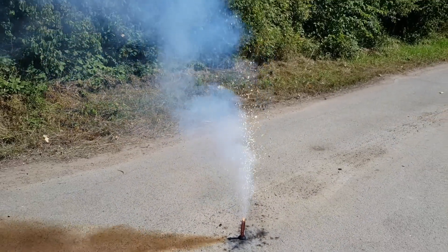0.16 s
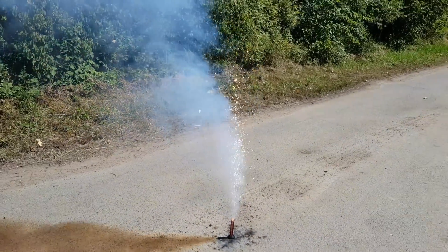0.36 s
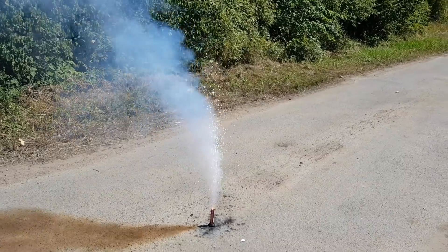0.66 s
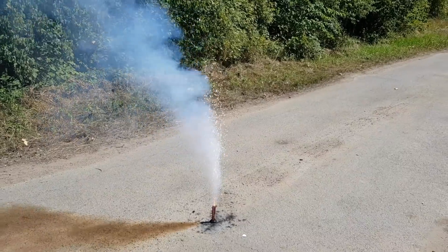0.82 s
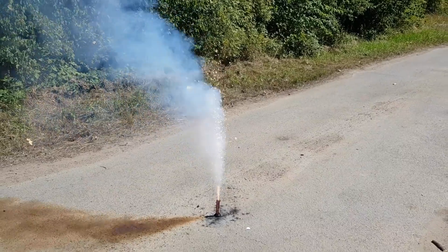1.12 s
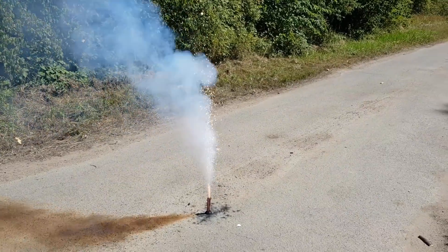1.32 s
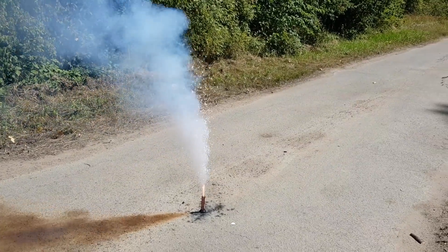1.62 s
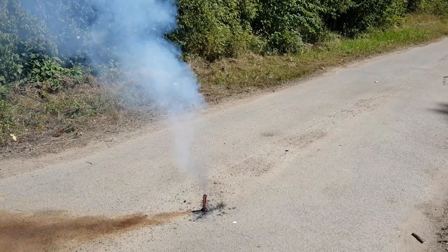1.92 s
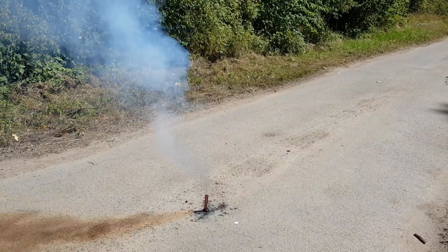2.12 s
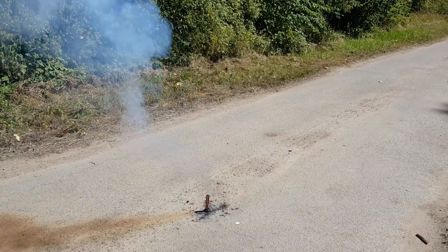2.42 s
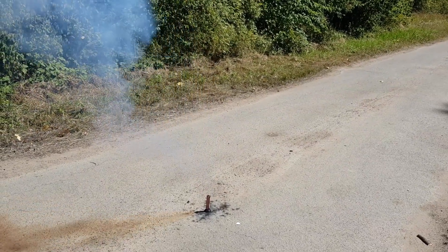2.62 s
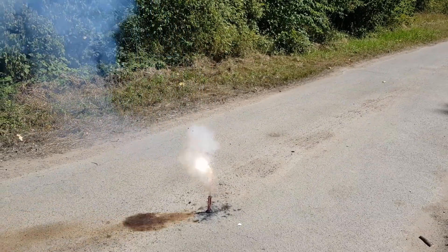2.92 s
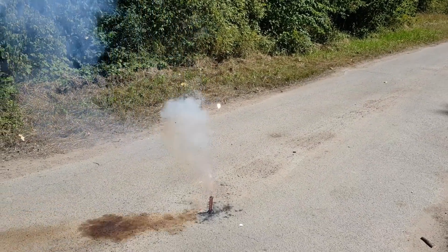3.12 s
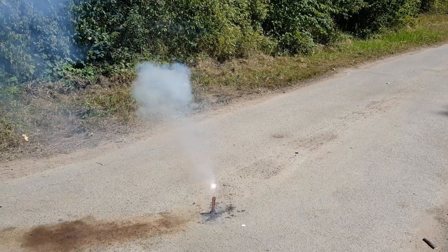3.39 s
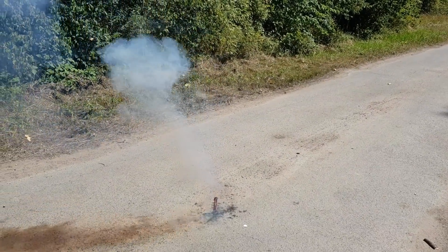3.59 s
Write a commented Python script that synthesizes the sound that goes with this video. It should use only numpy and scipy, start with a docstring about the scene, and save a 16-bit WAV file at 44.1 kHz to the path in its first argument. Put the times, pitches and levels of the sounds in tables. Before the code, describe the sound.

A small fountain firework whistles with a sinking pitch, fades to a hiss and a soft puff, then spits sharp crackles and low thumps. It burns a few metres away on an outdoor road, its cracks overloading the microphone.

```python
"""On a paved road with bushes behind it, a small fountain firework burns a few metres away.
Its tube whistles, sinking in pitch as the fuel burns down, then only hisses and goes out with a puff.
After a low smoulder it throws out crackling stars (burning pellets): sharp cracks that overload
the microphone, and a few thumps of air. The road and the bushes echo over a low outdoor rumble."""
import sys
import numpy as np
from scipy import signal
from scipy.fft import rfft, irfft
from scipy.io import wavfile
from scipy.ndimage import uniform_filter1d

SR = 44100
rng = np.random.default_rng(int(sys.argv[2]) if len(sys.argv) > 2 else 0)


def wav_record(signal):
    """Record a signal, one row per channel, as 16-bit PCM in the file named by sys.argv[1]."""
    frames = np.transpose(np.atleast_2d(signal))
    bounded = np.clip(frames, -1, 1)
    # unit amplitude maps onto the largest positive 16-bit level
    quanta = np.round(bounded * 32767).astype(np.int16)
    wavfile.write(sys.argv[1], SR, quanta)


N = 165375  # 3.75 seconds
TIME_S = np.arange(N) / SR


# The sinking note of the tube: time_s, pitch_hz
TUBE_PITCH = [(0, 3935), (.08, 3907), (.12, 3818), (.2, 3783), (.25, 3733), (.3, 3718), (.36, 3688),
              (.4, 3633), (.5, 3556), (.69, 3461), (.74, 3406), (.83, 3384), (.94, 3290), (1.0, 3287),
              (1.13, 3130), (1.35, 2954), (1.72, 2850)]
# How loud that note is on each side: time_s, left_db, right_db
NOTE_LEVELS = [(0, -14, -7.5), (.04, -22, -16), (.11, -6.5, -11), (.18, -16.5, -11), (.23, -20.5, -10),
               (.29, -12, -12.5), (.34, -11.5, -17.5), (.39, -9, -31), (.47, -11.5, -28), (.55, -9.5, -27),
               (.63, -10, -31), (.69, -14.5, -21.5), (.74, -14.5, -17), (.83, -16, -13.5),
               (.885, -32, -24.5), (.95, -13.5, -20), (1.0, -16.5, -23.5), (1.06, -24.5, -29),
               (1.15, -54, -50)]
# Overtones at 2, 3 and 4 times its pitch: time_s, second_db, third_db, fourth_db
OVERTONE_LEVELS = [(0, -28, -29.5, -43), (0.05, -37, -25, -34), (0.13, -30, -19, -45),
                   (0.3, -27.5, -23.5, -36), (0.38, -33.5, -30.5, -38), (0.5, -24.5, -37.5, -43),
                   (0.68, -24, -31, -49), (0.77, -21, -32, -55), (0.88, -23, -36.5, -46),
                   (0.94, -31, -37, -52), (1.01, -32.5, -47, -60), (1.09, -56, -77, -72)]

def whistle(wander_hz=8.95, jitter_hz=12, right_lag_ms=0.07, rough_db=-30.5):
    """Pulsing flame sounds the tube: a fluttering, slightly rough note with three overtones."""
    pitch_hz = curve(TUBE_PITCH) + wander_hz * wander(44.52) + jitter_hz * wander(500)
    lag_s = np.array([[0], [right_lag_ms / 1000]])
    phase = 2 * np.pi * (np.cumsum(pitch_hz) / SR - pitch_hz * lag_s)
    flutter_db = 0.66 * wander(119.6)
    note_db = np.array([curve(NOTE_LEVELS, 1), curve(NOTE_LEVELS, 2)]) + flutter_db
    tone = gain(note_db) * (np.sin(phase) + gain(rough_db) * noise_around(phase, 700))
    lean_left_db = np.array([[3], [-3]])
    for multiple in (2, 3, 4):
        level_db = curve(OVERTONE_LEVELS, multiple - 1) + flutter_db + 2 * wander(35) + lean_left_db
        wobble = 0.26 * np.array([wander(160), wander(160)])
        tone += gain(level_db) * np.sin(multiple * phase + wobble)
    fade = np.exp(-np.maximum(TIME_S - 1.13, 0) / 0.045)  # dies quickly after 1.13 s
    return np.sqrt(2) * tone * fade


# The breathy sound left as the whistle dies: time_s, level_db
RING_LEVEL = [(.95, -70), (1.1, -45), (1.3, -48.5), (1.7, -56), (1.85, -100)]

def tube_ring(width_hz=480):
    """The gas jet still rings the tube, as a narrow band of noise that goes on sinking."""
    phase = 2 * np.pi * np.cumsum(curve(TUBE_PITCH)) / SR
    breath = np.array([noise_around(phase, width_hz) for _ in range(2)])
    return breath * gain(curve(RING_LEVEL))


# Sharp cracks of sparks and stars, and a few of their near echoes.
# Levels are before each part's boost or cut: start_s, snap_db, body_db
SHARP_CRACKS = [(2.0543, -45, -53.5), (2.1807, -40.5, -49), (2.2053, -40.5, -49), (2.476, -29, -29.5),
                (2.5544, -38.5, -40.0), (2.609, -35, -30.5), (2.6607, -28.5, -33.5), (2.7267, -37, -28.5),
                (2.7358, -10.5, -17.5), (2.772, -29.5, -30), (2.7858, -14.5, -18), (2.8195, -7, -12.5),
                (2.8225, -9.5, -19), (2.83, -12.5, -24), (2.8478, -13, -24), (2.858, -15, -22),
                (2.862, -10, -21), (2.8675, -8, -10.5), (2.8765, 0.5, -13), (2.8958, -14.5, -21),
                (2.916, -17.5, -20), (2.9254, -7, -10), (2.938, -11.5, -29), (2.963, -14.5, -22),
                (2.9714, -10.5, -19.5), (2.9782, -8.5, -20), (2.9872, -6.5, -17), (2.9905, -11, -17),
                (2.9988, -7, -14.5), (3.0314, -4.5, -14), (3.0391, -9.5, -13.5), (3.0568, 1, -6.5),
                (3.0732, -12, -19.5), (3.0835, -11.0, -18), (3.1, -11, -13), (3.103, -16, -15.0),
                (3.1358, -14.5, -26), (3.1545, -15, -20), (3.179, -6, -9.5), (3.1925, -6, -12),
                (3.2428, 2.5, -5.5), (3.2943, -0.5, -10), (3.3015, -17.5, -28), (3.315, -7.5, -15),
                (3.3195, -7.5, -11.5), (3.338, -16, -33), (3.3602, -6, -10), (3.3845, -11, -26),
                (3.4203, -12.5, -15.5), (3.4252, -14, -20), (3.4722, -28, -30.5), (3.482, -2.5, -8.5),
                (3.5039, -23.5, -25), (3.5345, -20.5, -34), (3.5604, -10.5, -11.5), (3.6083, -5.5, -12),
                (3.6525, -16, -23.5), (3.7325, -36, -44), (3.74, -33, -36.0)]
# The mix of low and high in cracks, crackle and gas spurts: pitch_hz, relative_db
CRACK_COLOUR = [(100, 3.5), (480, 2), (750, -3.5), (1250, -2), (1800, 0.5), (2400, 2.5), (3000, -1),
                (4100, 1), (5000, 2.5), (6400, 3), (8000, -2.5), (12000, -1.5), (16000, -2.5)]
BOUNCE_MS, BOUNCE_DB = 1.9, -8  # the echo off the road

def cracks(noise_decay_ms=0.65, grit_decay_ms=2.4):
    """Each crack is a bright snap over a duller push of gas, with a bounce off the road and grit."""
    out, size = np.zeros((2, N)), 512
    ms = np.arange(size) / SR * 1000
    noise_fade = gain(-2.5) * np.exp(-(ms / noise_decay_ms) ** 2 / 2)
    bright = signal.butter(2, 3040, "high", fs=SR, output="sos")
    dull = signal.butter(2, [547, 2380], "band", fs=SR, output="sos")

    def at_level(x, db):
        """Set the level as if all the energy fell within 1.5 ms."""
        return gain(db) * x / np.sqrt(np.sum(x ** 2) / (2 * np.sum(ms < 1.5)))

    for start_s, snap_db, body_db in SHARP_CRACKS:
        noise = rng.standard_normal((4, size))
        shared_noise, side_noise = noise[0], noise[1:3]
        bounce_luck, length_luck, side_luck = noise[3, :3]
        shock_ms = 0.22 * np.exp(0.33 * length_luck)
        lag_ms = 0.06 + 0.023 * side_luck  # the stars scatter sideways
        shock = (1 - 2 * ms / shock_ms) * (ms < shock_ms)  # air pressure traces the letter N
        snap = stereo(shock + shared_noise * noise_fade, lag_ms) + 0.58 * side_noise * noise_fade
        snap = at_level(signal.sosfilt(bright, snap), snap_db + 1)
        push = stereo(signal.unit_impulse(size), lag_ms) + 0.083 * side_noise * noise_fade
        body = at_level(signal.sosfilt(dull, push), body_db + 1.5)
        bounce = gain(BOUNCE_DB) * delay(snap + body, abs(BOUNCE_MS + 0.336 * bounce_luck))
        grit = gain(snap_db - 5) * np.roll(side_noise, size // 2, axis=1) * np.exp(-ms / grit_decay_ms)
        add(out, start_s, snap + body + bounce + grit)
    return colour(out, CRACK_COLOUR)


# The fine crackle: time_s, level_db
CRACKLE_LEVEL = [(2.7, -71), (2.75, -43), (2.83, -35.5), (2.92, -36.5), (3.0, -27), (3.08, -19),
                 (3.17, -26.5), (3.22, -40.5), (3.32, -23), (3.4, -38), (3.46, -56.5), (3.55, -64),
                 (3.64, -36), (3.7, -62)]

def crackle(grains_per_s=230, spread_db=5):
    """Many tiny grains of every size burst between the loud cracks and echo off the road."""
    pops = rng.random(N) < grains_per_s / SR
    sizes = gain(spread_db * np.minimum(rng.exponential(size=N), 4))
    signs = rng.choice([-1, 1], N)
    started = TIME_S > CRACKLE_LEVEL[0][0]
    grains = normalise(pops * sizes * signs) * gain(curve(CRACKLE_LEVEL)) * started
    direct = stereo(grains, lag_ms=0.06)
    return colour(direct + gain(BOUNCE_DB) * delay(direct, BOUNCE_MS), CRACK_COLOUR)


# Pushes of air as stars are thrown out (minus flips the swing): start_s, left_gain, right_gain
AIR_PUSHES = [(2.7855, 1.24, 0.3), (2.9901, 0.052, 0.89), (3.1, 0.0028, 0.84), (3.179, 0.74, 1),
              (3.5592, -0.27, 0.85), (3.6076, 0.18, 0.84)]

def thumps(pitch_hz=55.2, ring_s=0.0213, spurt_db=-28, spurt_peak_s=0.018):
    """A push of air makes the microphone swing at a low pitch; a spurt of gas follows."""
    swings, gas_level = np.zeros((2, N)), np.zeros((2, N))
    t = np.arange(SR // 5) / SR
    cycles = pitch_hz * t + 0.62 * (1 - np.exp(-t / 0.00128))  # the first swing is faster
    swing = np.sin(2 * np.pi * cycles) * np.exp(-(t / ring_s) ** 2)
    spurt = gain(spurt_db) * t / spurt_peak_s * np.exp(1 - t / spurt_peak_s)
    for start_s, left, right in AIR_PUSHES:
        add(swings, start_s, np.outer([left, right], swing))
        add(gas_level, start_s, np.outer([1, 1], spurt))
    return swings + gas_level * stereo_noise(CRACK_COLOUR, split_hz=540)


# How loud the hiss and the smoulder are: time_s, level_db
HISS_LEVEL = [(0, -36), (.08, -40), (.13, -37), (.55, -40), (1.0, -40.5), (1.11, -45.5), (1.55, -44.5),
              (1.74, -43.5), (1.79, -52), (1.92, -56.5), (2.0, -97.5)]
SMOULDER_LEVEL = [(1.1, -48), (1.7, -45), (1.9, -47.5), (2.1, -45), (2.35, -42), (2.72, -40), (2.85, -48),
                  (3.75, -52)]
# The bright hiss, dull puff and low smoulder: pitch_hz, relative_db
HISS_COLOUR = [(200, -17), (700, -12), (1500, -5), (2400, 5), (2950, -3.5), (3500, -1.5), (4300, -6),
               (5500, -7), (6700, -1.5), (7900, -11), (10000, -5.5), (11800, -6.5), (13500, -3),
               (16000, -15)]
PUFF_COLOUR = [(40, -26), (190, -0.5), (450, -5.5), (800, -13), (2500, -24), (16000, -30.5)]
SMOULDER_COLOUR = [(150, 7.5), (450, 5), (800, 4.5), (1400, 1), (2000, 0), (2800, -11.5), (5000, -20),
                   (6400, -21), (8000, -35), (10000, -30.5), (16000, -28.5)]

def gas_jet(puff_start_s=1.72, puff_rise_s=0.0105, puff_db=-31):
    """Gas hisses out of the tube, ends in a puff and leaves the fuel smouldering."""
    hiss = stereo_noise(HISS_COLOUR, split_hz=400)
    hiss *= gain(curve(HISS_LEVEL) + 0.74 * wander(150) + 0.95 * wander(13.55))
    puff_age = np.maximum(TIME_S - puff_start_s, 0) / puff_rise_s
    puff = stereo_noise(PUFF_COLOUR, split_hz=1600)
    puff *= gain(puff_db) * puff_age * np.exp((1 - puff_age ** 2) / 2)
    smoulder = stereo_noise(SMOULDER_COLOUR, split_hz=520)
    smoulder *= gain(curve(SMOULDER_LEVEL) + 0.59 * wander(40))
    return hiss + puff + smoulder


# Two near echoes: delay_ms, level_db
NEAR_ECHOES = [(7.8, -21), (22, -22.5)]
# The sound the leaves send back: pitch_hz, relative_db
LEAF_COLOUR = [(100, 6.5), (600, -10.5), (2000, 3.5), (6000, 2.5), (9000, 4.5), (16000, 2.5)]

def bushes(sound, tail_db=-16, rise_s=0.012, low_fade_s=0.22, high_fade_s=0.23):
    """Two near echoes, and a short blurred tail of sound scattered by the leaves."""
    noise = stereo_noise(LEAF_COLOUR, split_hz=600) * (1 - np.exp(-TIME_S / rise_s))
    low = signal.sosfiltfilt(signal.butter(2, 5900, fs=SR, output="sos"), noise)
    high = noise - low
    tail = low * gain(-60 * TIME_S / low_fade_s) + high * gain(-60 * TIME_S / high_fade_s)
    tail /= np.sqrt(np.sum(tail ** 2) / 2)
    scattered = gain(tail_db) * signal.fftconvolve(sound, tail, axes=1)[:, :N]
    return scattered + sum(gain(db) * delay(sound, ms) for ms, db in NEAR_ECHOES)


# The outdoor rumble: pitch_hz, relative_db
RUMBLE_COLOUR = [(20, -31), (45, -10), (75, 0.5), (110, -1), (170, -17.5), (300, -17), (600, -21),
                 (2000, -35.5), (16000, -72)]

def outdoors(rumble_db=-47.5, drone_db=-52, drone_peak_s=1.75, swell_s=1.0, sink_hz_per_s=48):
    """A low uneven rumble, and a faint far drone that swells and fades as its pitch sinks."""
    rumble = stereo_noise(RUMBLE_COLOUR, split_hz=1300) * gain(rumble_db + 0.78 * wander(4.2))
    from_peak_s = TIME_S - drone_peak_s
    drone_hz = 780 - sink_hz_per_s * from_peak_s + 7 * wander(40)
    drone = np.sin(2 * np.pi * np.cumsum(drone_hz) / SR)
    swell = np.exp(-(from_peak_s / swell_s) ** 2)
    return rumble + drone * swell * gain(drone_db + 1.1 * wander(12))


def gain(db):
    """Turn decibels into a number to multiply by."""
    return 10 ** (np.asarray(db) / 20)


def curve(table, column=1):
    """One column of a table, joined by straight lines in time."""
    rows = np.array(table, float)
    return np.interp(TIME_S, rows[:, 0], rows[:, column])


def normalise(x):
    """Scale to an average power of 1."""
    return x / np.sqrt(np.mean(x ** 2))


def wander(changes_per_s):
    """A smooth random wiggle, typically of size 1."""
    hold = max(int(SR / changes_per_s), 2)
    steps = np.repeat(rng.standard_normal(N // hold + 1), hold)
    return normalise(uniform_filter1d(steps, hold)[:N])


def noise_around(phase, width_hz):
    """A narrow band of noise that follows a note."""
    return wander(width_hz) * np.sin(phase) + wander(width_hz) * np.cos(phase)


def colour(x, points):
    """Change the mix of low and high pitches; white noise keeps its power."""
    size = 8192
    hz, db = np.array(points, float).T
    log_hz = np.log(np.fft.rfftfreq(size, 1 / SR) + 1)
    gains = normalise(gain(np.interp(log_hz, np.log(hz), db)))
    # Make the filter ring only after a click, never before it.
    cepstrum = irfft(np.log(gains))
    cepstrum[1:size // 2] *= 2
    cepstrum[size // 2 + 1:] = 0
    click_response = irfft(np.exp(rfft(cepstrum)))
    return signal.fftconvolve(x, click_response[None], axes=1)[:, :N]


def stereo_noise(points, split_hz):
    """Coloured noise, alike on both sides below split_hz and unrelated above."""
    mid, side = rng.standard_normal((2, N))
    side = signal.sosfilt(signal.butter(1, split_hz, "high", fs=SR, output="sos"), side)
    return normalise(colour(np.array([mid + side, mid - side]), points))


def delay(x, ms):
    """Make a sound later, even by part of a sample; its end wraps round to the start."""
    size = x.shape[-1]
    hz = np.fft.rfftfreq(size, 1 / SR)
    return irfft(rfft(x) * np.exp(-2j * np.pi * hz * ms / 1000), size)


def stereo(x, lag_ms):
    """A sound that reaches the right side lag_ms after the left."""
    return np.array([x, delay(x, lag_ms)])


def add(out, start_s, x):
    """Mix in a short stereo sound at start_s."""
    i = int(np.clip(start_s * SR, 0, N - 1))
    out[:, i:i + x.shape[1]] += x[:, :N - i]


def scene():
    """The firework and its echoes over the outdoor background."""
    tone = whistle()
    crackling = cracks() + crackle()
    echoes = bushes(crackling + gain(-0.5) * tone)
    return tone + crackling + echoes + tube_ring() + gas_jet() + thumps() + outdoors()


def record(dry, fast_rate_hz=48000, hardness=3.9, top_hz=15900):
    """Loud peaks overload the microphone; dropping samples adds faint gliding tones to the whistle."""
    fast = signal.resample(dry, N * fast_rate_hz // SR, axis=1)
    squashed = fast / (1 + abs(fast) ** hardness) ** (1 / hardness)
    kept = squashed[:, np.arange(N) * fast_rate_hz // SR]
    return signal.sosfilt(signal.ellip(8, .2, 70, top_hz, fs=SR, output="sos"), kept)


dry = scene()
out = record(dry)
wav_record(out)
```